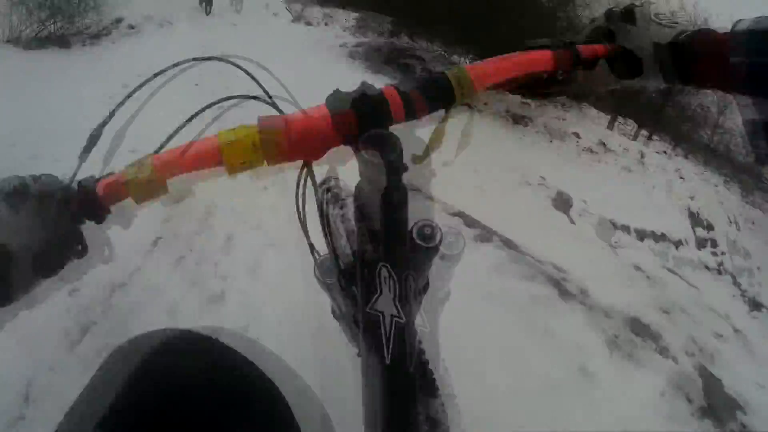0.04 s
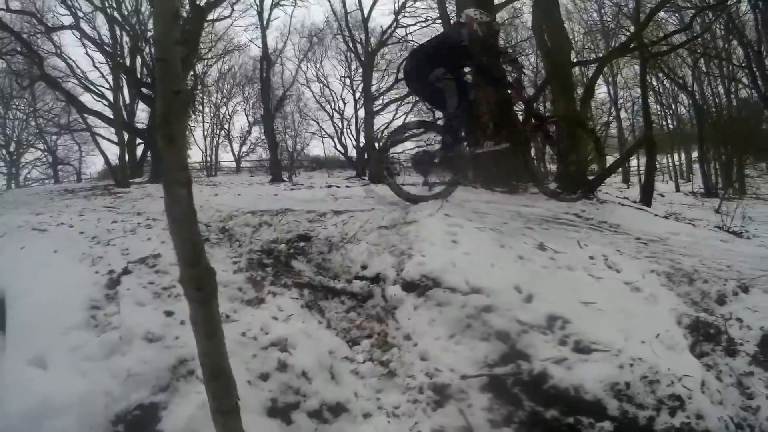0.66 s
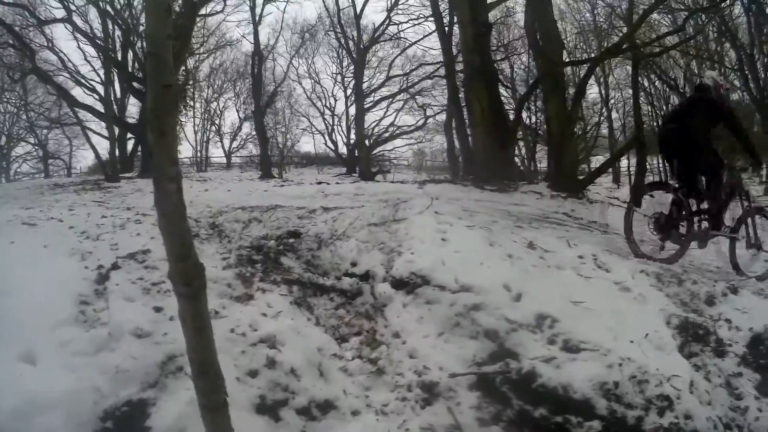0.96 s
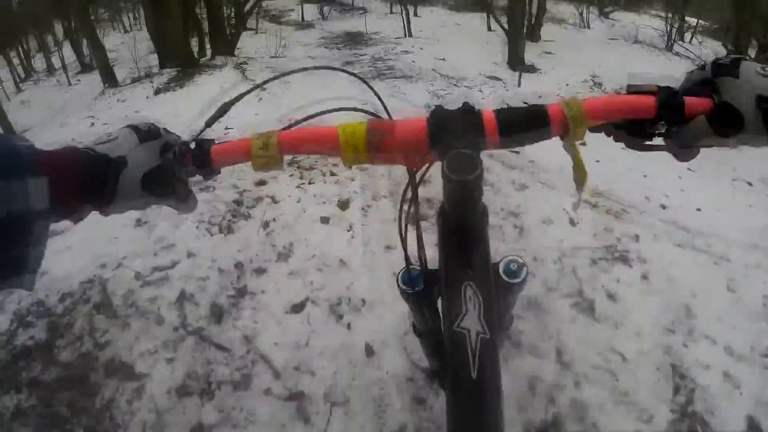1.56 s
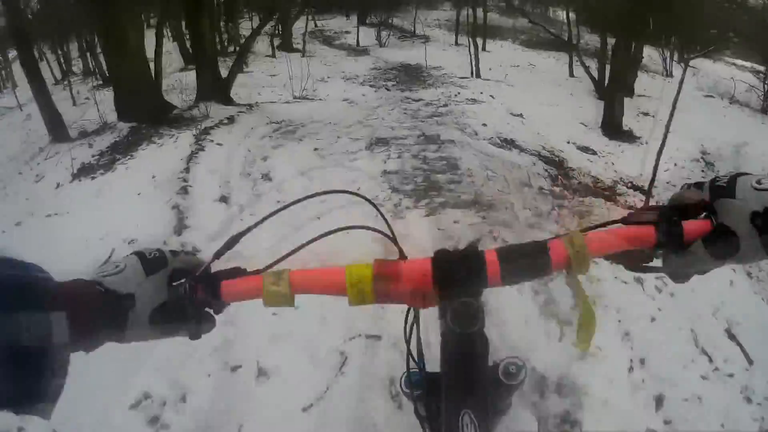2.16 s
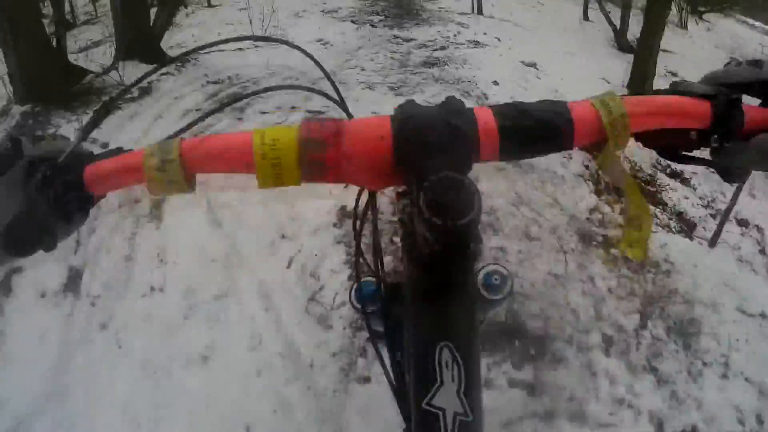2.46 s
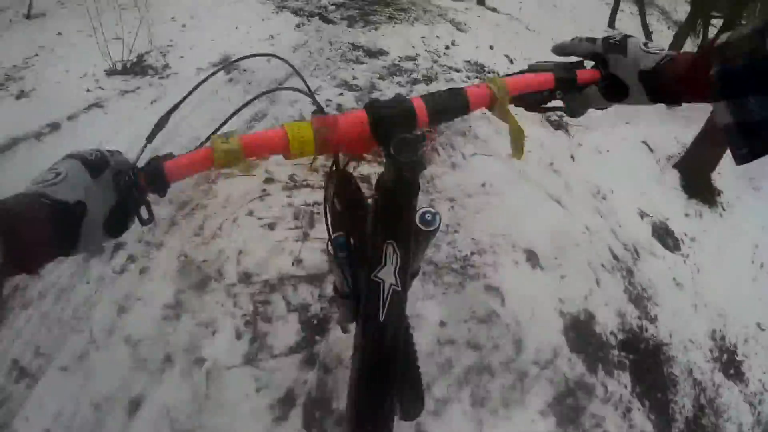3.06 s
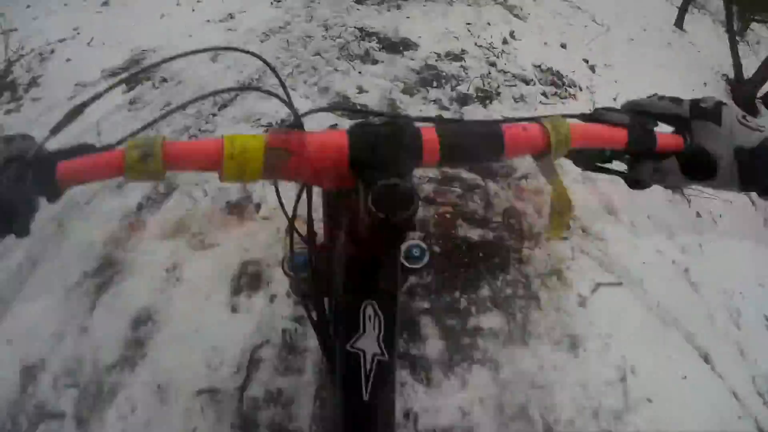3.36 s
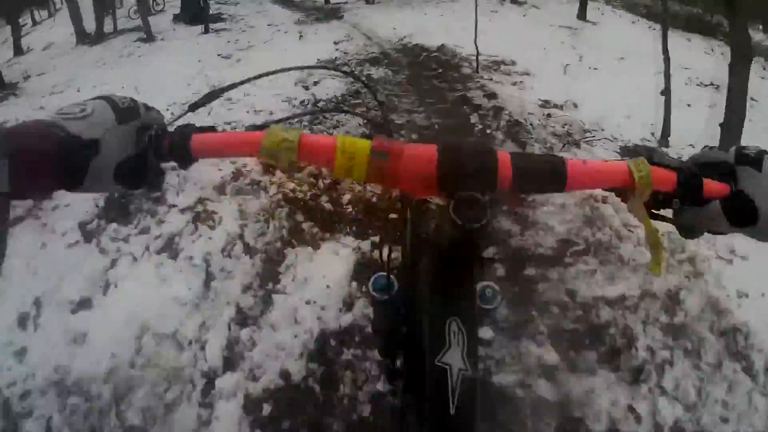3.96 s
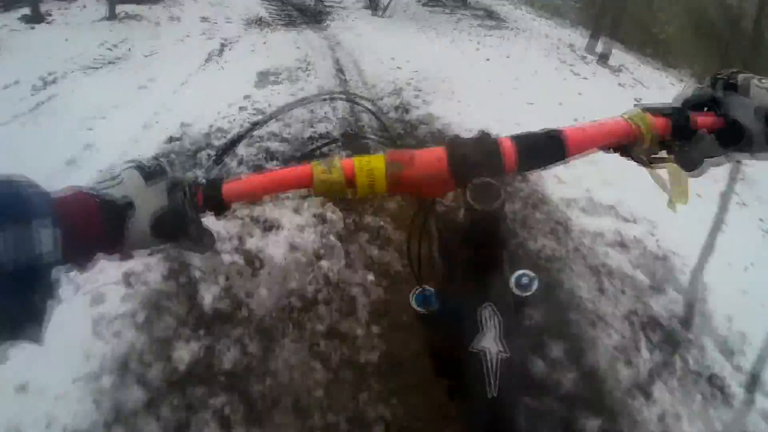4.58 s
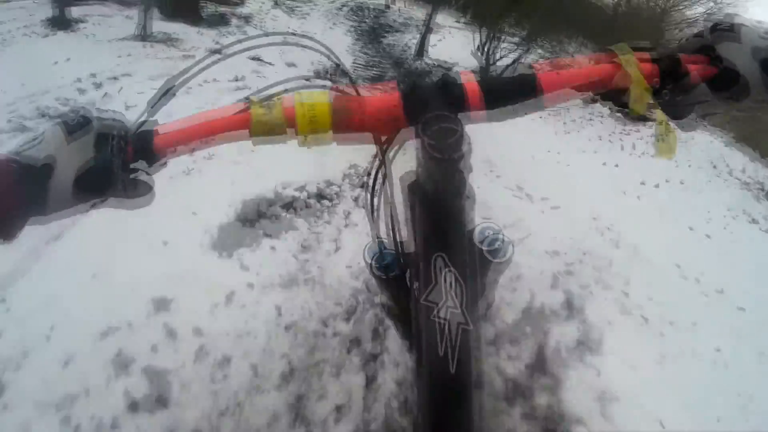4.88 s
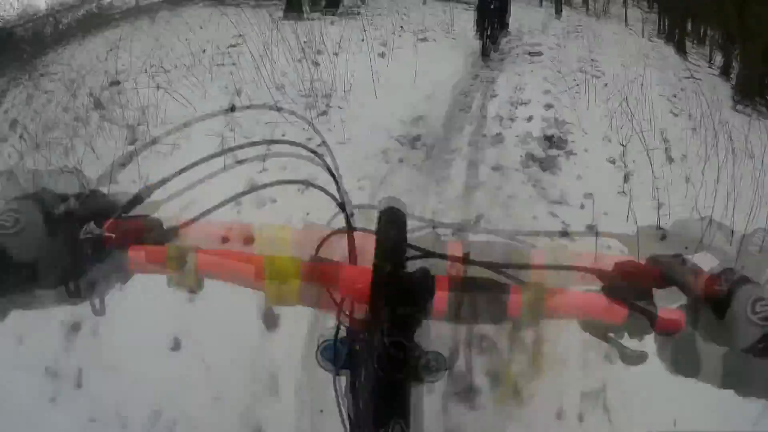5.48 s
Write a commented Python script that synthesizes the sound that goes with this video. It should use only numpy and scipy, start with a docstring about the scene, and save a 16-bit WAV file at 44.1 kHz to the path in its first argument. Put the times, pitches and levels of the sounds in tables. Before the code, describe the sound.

Wind and rough ground boom inside the plastic case of a body-worn camera as a mountain bike rides a snowy woodland trail. The wind soon falls quiet, then the ride returns with a faint, short skid. From about halfway, bumps bring hollow thumps and sharp, sometimes overloading knocks from the bike and camera mount. The buffeting grows louder, with dull tyre crunch and a thin high whirr far beneath it.

```python
"""Airflow and rough ground boom in the plastic case of a body-worn camera, with deep swings of wind
below, as a mountain bike rides a snowy woodland trail. Bumps thump the case; parts of the bike and mount
knock on it hard enough to overload the microphone. The tyres crunch dully through its walls and throw up
spray. For a moment the tyre sound drops out and the wind falls quiet, then the ride cuts back in.
Further back sit a short skid, a faint brake note, a thin high whirr and the still woods."""
import sys
import numpy as np
from scipy import signal
from scipy.fft import rfft, irfft
from scipy.io import wavfile
from scipy.ndimage import uniform_filter1d

SR = 44100
rng = np.random.default_rng(int(sys.argv[2]) if len(sys.argv) > 2 else 0)


def int16_out(signal):
    """Quantize to a 16-bit WAV file."""
    q = np.round(np.clip(np.atleast_2d(signal).T, -1, 1) * 32767)
    wavfile.write(sys.argv[1], SR, q.astype(np.int16))


N = 252693
TIME = np.arange(N) / SR

# Tone of the buffeting inside the case: (frequency [Hz], level [dB])
BOOM_SPECTRUM = [(30, -23), (70, -25.5), (100, -8.5), (130, -6), (220, -6.5), (290, -4.5), (348, 1.5),
                 (400, -7.5), (480, -15.5), (600, -25), (800, -39.5), (1300, -62), (3000, -73.5),
                 (9000, -99.5)]
# Low end of the wind: (frequency [Hz], level [dB])
WIND_SPECTRUM = [(15, -20.5), (30, -4), (55, -5.5), (85, -2.5), (115, -2.5), (180, -12.5), (400, -46.5),
                 (1500, -91.5)]
# Gusts pressing on the case: (start [s], length [s], level [dB])
GUSTS = [(0.02, 0.16, -25.5), (0.31, 0.05, -27.5), (1.02, 0.05, -44), (2.97, 0.22, -26.5),
         (5.07, 0.069, -24), (5.55, 0.15, -23)]
def buffeting(boom_db=-1, split_hz=470, wind_db=-24.5, wind_slope=0.55):
    """Eddies and ground shake boom in the case, over deep swings of wind that follow the shaking."""
    boom = turbulence(BOOM_SPECTRUM, steadiness=0.23, eddy_s=0.023)
    lows = signal.sosfiltfilt(signal.butter(4, split_hz, fs=SR, output="sos"), boom)
    strength = shake()
    boom = lows * strength + (boom - lows) * shake(hard=True)
    wind = turbulence(WIND_SPECTRUM, steadiness=0.3, eddy_s=0.18)
    gusts = swells(GUSTS, attack_s=0.0089, release_s=0.011)
    return boom * undb(boom_db) + wind * np.hypot(undb(wind_db) * strength ** wind_slope, gusts)


# Airflow over the case, rising with speed: (time [s], level [dB])
AIRFLOW = [(0, -28), (0.355, -33.5), (0.385, -40), (0.55, -39.5), (0.74, -51.5), (0.98, -54), (1.47, -48),
           (1.57, -38), (2.15, -39), (2.55, -31.5), (3.1, -27), (3.28, -36.5), (3.33, -21.5), (3.6, -16),
           (3.95, -21.5), (4.6, -21), (5.38, -26.5), (5.73, -18)]
# Rough ground: (start [s], length [s], level [dB], hardness as gain above the case's resonance [dB])
JOLTS = [(0, 0.026, -15, -27), (0.082, 0.099, -21, -22), (1.015, 0.26, -38, -4), (2.202, 0.096, -35.5, 0),
         (2.598, 0.056, -19, -6), (2.665, 0.07, -12.5, -3.5), (2.758, 0.086, -14.5, 3.5),
         (2.997, 0.024, -11.5, -15), (3.162, 0.024, -14.5, -6), (3.522, 0.05, -16.5, 1),
         (3.626, 0.082, -5.5, 1), (3.715, 0.145, -9, 1), (4.11, 0.327, -13, -1), (4.717, 0.032, -15.5, -19),
         (4.875, 0.061, -19, -3), (4.968, 0.192, -14, -1), (5.456, 0.11, -19, -9), (5.504, 0.18, -12.5, 1)]
JOLT_ATTACK_S, JOLT_RELEASE_S = 0.012, 0.0069
def shake(hard=False, airflow_hardness_db=-2):
    """Envelope of airflow and jolts shaking the case; with hard, the one above its resonance."""
    airflow = undb(curve(AIRFLOW) + hard * airflow_hardness_db)
    jolts = [(start, length, db + hard * hardness_db) for start, length, db, hardness_db in JOLTS]
    return np.hypot(airflow, swells(jolts, JOLT_ATTACK_S, JOLT_RELEASE_S))


def case_hum(hz=358, width_hz=75, gain_db=-6):
    """Airflow and jolts keep the hollow of the case humming."""
    hum = narrow_noise(hz, width_hz)
    power = uniform_filter1d(hum ** 2, SR // 30)
    return unit(hum / power ** 0.25) * shake() * undb(gain_db)  # compressed 2:1, then shaken


# Bumps in the trail: (time [s], level [dB], pitch [Hz], attack [s])
THUMPS = [(0.008, -8.5, 373.7, 0.0071), (1.766, -25, 337, 0.0062), (2.019, -22.5, 341, 0.0041),
          (2.814, -8, 152, 0.0046), (2.816, -5.5, 360.2, 0.0079), (2.902, 0.5, 397, 0.0031),
          (2.983, -12.5, 370, 0.0095), (3.011, -16, 355, 0.0024), (3.074, 4, 396, 0.0022),
          (3.154, -11.5, 405, 0.0057), (3.169, -2.5, 332, 0.0039), (3.307, -8.5, 387, 0.0038),
          (3.597, -8, 416, 0.0039), (4.102, -11.5, 438, 0.0046), (4.397, -1.5, 397, 0.0036),
          (4.516, -3, 362, 0.0051), (5.018, -5, 378, 0.0053), (5.186, -10.5, 365, 0.0059),
          (5.549, 2, 374, 0.0046)]
def thumps(mount_hz=140, mount_db=-11):
    """A soft push swells and dies in the hollow of the case, over the slower sway of its mount."""
    out, t = np.zeros(N), TIME[:SR // 8]
    mount = undb(mount_db) * np.sin(2 * np.pi * mount_hz * t)
    for at_s, db, hz, attack_s in THUMPS:
        envelope = t / attack_s * np.exp(1 - t / attack_s)
        add(out, at_s, undb(db) * envelope * (np.sin(2 * np.pi * hz * t) + mount))
    return out


# The case's ring under every knock: (frequency [Hz], width [Hz], level [dB])
CASE_MODES = [(646, 87, 7), (780, 350, 1.5), (1115, 98, 5.5), (1372, 112, 5.5), (1600, 40, -4),
              (1938, 118, 0), (2326, 98, -5.5), (2900, 330, -9), (3750, 74, -2.5), (4850, 680, -6.5),
              (5250, 1200, -12), (6000, 1100, -17), (7040, 2300, -17), (10600, 330, -18),
              (11180, 530, -16.5), (14600, 180, -2)]
# Hits of bike and mount: (time [s], level [dB], ring of the struck part [Hz], high cut [Hz])
KNOCKS = [(2.218, -40.5, 1210, 2800), (2.6125, -24, 1150, 1700), (2.68, -15.5, 1130, 2490),
          (2.794, -9.5, 1220, 4830), (2.8143, -1, 4370, 6500), (2.815, -0.5, 5900, 15100),
          (2.9055, -8.5, 1520, 6740), (2.9074, -13, 1770, 5400), (3.0057, -10, 5600, 8000),
          (3.0062, -13.5, 3750, 4800), (3.0087, -13, 1700, 3500), (3.0748, -3, 1670, 6000),
          (3.0756, -2, 5250, 9600), (3.207, -32.5, 1140, 1500), (3.3572, -16.5, 1470, 2850),
          (3.368, -12.5, 2040, 3150), (3.394, -33.5, 10200, 11900), (3.758, -14, 3170, 15900),
          (3.785, -24, 2900, 3800), (4.292, -34, 3100, 4000), (4.371, -16.5, 2050, 3030),
          (4.3934, -13.5, 1520, 4430), (4.6979, -11.5, 1280, 2060), (4.7444, -17.5, 2900, 3050),
          (4.929, -16, 1960, 3600), (4.9296, -15.5, 2950, 3900), (5.119, -19.5, 1230, 1460),
          (5.131, -31, 6200, 13100), (5.4938, -17, 1250, 1600), (5.656, -32.5, 7000, 12000),
          (5.668, -26.5, 1550, 9000), (5.675, -22.5, 1920, 5500)]
def knocks(grit_s=0.001, grit_db=-9, chatter_s=0.0055, chatter_db=-31, part_q=8, part_db=5, gain_db=2):
    """A click with a trail of grit rings the case and the struck part; softer contact loses the top."""
    out, t = np.zeros(N), TIME[:SR // 16]
    trail = undb(grit_db) * np.exp(-t / grit_s) + undb(chatter_db) * np.exp(-t / chatter_s)
    for at_s, db, part_hz, top_hz in KNOCKS:
        force = (t == 0) + trail * rng.standard_normal(len(t))
        hit = ring(force, CASE_MODES) + ring(force, [(part_hz, part_hz / part_q, part_db)])
        hit = highpass(lowpass(hit, top_hz), hz=550)
        add(out, at_s, undb(db + gain_db) * hit / np.abs(hit).max())
    return out


# Wall resonances that let the tyres through: (frequency [Hz], width [Hz], level [dB])
WALL_MODES = [(1093, 180, 5), (1353, 111, 7.5), (1836, 320, 0.5), (2950, 460, -2.5), (3750, 670, -2),
              (4274, 500, -1)]
# Tone of the spray: (frequency [Hz], level [dB])
SPRAY_SPECTRUM = [(1000, -15.5), (3500, 1.5), (4900, -5), (5750, 1), (6500, -5.5), (8600, -5),
                  (10300, -8.5), (12800, -17), (14800, -10.5), (15800, -33)]
# Tyres rolling through snow, one fader curve per run: (time [s], level [dB])
ROLL_RUNS = [
    [(0.0, -62), (0.114, -59.5), (0.38, -66.5)],
    [(1.63, -62), (1.74, -64), (2.07, -67.5), (2.46, -62), (2.79, -53), (2.89, -53.5), (3.09, -63),
     (3.36, -58.5), (3.51, -52), (3.78, -51.5), (4.16, -57), (4.87, -52.5), (5.04, -55.5), (5.31, -53.5),
     (5.48, -52), (5.73, -49.5)],
]
# Patches of wet snow: (start [s], length [s], level [dB])
SLUSH = [(1.03, 0.18, -65.5), (1.635, 0.031, -66), (2.22, 0.037, -63), (3.34, 0.08, -53.5),
         (3.8, 0.77, -65), (4.42, 0.24, -57.5), (4.7, 0.31, -54.5)]
def tyres(muffle_hz=4700, tread_db=5.5, spray_db=-7, slush_tread_db=-5):
    """The tread crunches dully through the case walls; the spray hisses above it, more in wet snow."""
    roll = sum(undb(curve(run, left=-np.inf, right=-np.inf)) for run in ROLL_RUNS)
    slush = swells(SLUSH, attack_s=0.02, release_s=0.032)
    crunch = snow(grains_per_s=440, crunch_db=-7, flicker_db=2)
    tread = unit(lowpass(ring(crunch, WALL_MODES), muffle_hz)) * undb(tread_db)
    spray = colour(snow(grains_per_s=540, crunch_db=-8.5, flicker_db=4), SPRAY_SPECTRUM)
    tread *= np.hypot(roll, undb(slush_tread_db) * slush)
    spray *= np.hypot(undb(spray_db) * roll, slush)
    return tread + spray


def snow(grains_per_s, crunch_db, flicker_db, spread_db=4.5):
    """Flickering hiss of packed snow with the clicks of single crystals."""
    grains = (rng.random(N) < grains_per_s / SR) * rng.standard_normal(N)
    grains *= undb(spread_db * np.minimum(rng.exponential(size=N), 3))
    hiss = rng.standard_normal(N) * undb(flicker_db * wander(rate_hz=35))
    return hiss + undb(crunch_db) * unit(grains)


def skid(start_s=1.484, peak_s=1.562, end_s=1.612, start_db=-62, peak_db=-45):
    """A short dull swish of sliding snow swells and stops."""
    spectrum = [(300, -16), (800, -7.5), (1300, 1), (1550, -9), (1950, -11), (2600, -26),
                (6000, -32), (12000, -51)]  # (frequency [Hz], level [dB])
    swish = colour(rng.standard_normal(N), spectrum)
    gate = uniform_filter1d(1. * ((TIME > start_s) & (TIME < end_s)), SR // 100)
    return swish * undb(curve([(start_s, start_db), (peak_s, peak_db)])) * gate


def brake(at_s=1.728, fade_s=0.11, hz=708, db=-53):
    """A brake disc sings faintly for a moment."""
    return narrow_noise(hz, width_hz=30) * undb(db) * np.exp(-((TIME - at_s) / fade_s) ** 2)


# Swells of the whirr, perhaps the freewheel coasting: (start [s], length [s], level [dB])
WHIRR_SWELLS = [(0, 0.22, -68), (2.62, 0.58, -70), (5.08, 0.24, -67.5), (5.45, 0.28, -73)]
def whirr(hz=8680, width_hz=220, bed_db=-63.5, airflow_slope=0.37):
    """A thin band of high noise grows with the airflow and swells in spells."""
    bed = undb(bed_db + airflow_slope * curve(AIRFLOW))
    spells = swells(WHIRR_SWELLS, attack_s=0.05, release_s=0.05)
    return narrow_noise(hz, width_hz) * np.hypot(bed, spells)


# Tone of the background bed: (frequency [Hz], level [dB])
AMBIENCE_SPECTRUM = [(30, 7), (500, 2), (1000, -5.5), (2000, -11), (4200, -13), (5000, -14.5),
                     (9000, -15.5), (13000, -19), (15000, -31.5), (16000, -44)]
def ambience(db=-57.5):
    """Still air in the woods and microphone hiss."""
    return undb(db) * colour(rng.standard_normal(N), AMBIENCE_SPECTRUM)


def turbulence(spectrum, steadiness, eddy_s):
    """Coloured noise whose strength is partly evened out over the life of an eddy."""
    noise = colour(rng.standard_normal(N), spectrum)
    power = uniform_filter1d(noise ** 2, int(eddy_s * SR))
    return unit(noise / power ** (steadiness / 2))


def narrow_noise(hz, width_hz):
    """Noise rung twice through one resonance: a wavering note at rms 1."""
    mode = [(hz, width_hz, 0)]
    return unit(ring(ring(rng.standard_normal(N), mode), mode))


def swells(rows, attack_s, release_s):
    """Envelope of (start, length, level) events that rise, hold and die away; their powers add."""
    power = 0
    for start, length, db in rows:
        rise = np.minimum(TIME - start, 0) / attack_s
        fall = np.maximum(TIME - start - length, 0) / release_s
        power += (undb(db) * np.exp(rise - fall)) ** 2
    return np.sqrt(power)


def wander(rate_hz):
    """Glide between random values, at rms 1."""
    hold = int(SR / rate_hz)
    steps = np.repeat(rng.standard_normal(N // hold + 1), hold)
    return unit(uniform_filter1d(steps, hold)[:N])


def curve(rows, **outside):
    """Join (time, level) rows by straight lines."""
    return np.interp(TIME, *np.transpose(rows), **outside)


def colour(x, spectrum):
    """EQ a sound with (frequency, level) points, to rms 1."""
    hz, db = np.transpose(spectrum)
    bins = np.maximum(np.fft.rfftfreq(N, 1 / SR), 1)
    gain = undb(np.interp(np.log(bins), np.log(hz), db))
    return unit(irfft(rfft(x) * gain, N))


def ring(x, modes):
    """Drive (frequency, width, level) resonances; neighbours swing in opposite directions."""
    return sum((-1) ** k * undb(db) * signal.lfilter(*signal.iirpeak(hz, hz / width, fs=SR), x)
               for k, (hz, width, db) in enumerate(modes))


def lowpass(x, hz):
    """Fourth-order high cut."""
    return signal.sosfilt(signal.butter(4, hz, fs=SR, output="sos"), x)


def highpass(x, hz):
    """Second-order low cut."""
    return signal.sosfilt(signal.butter(2, hz, "high", fs=SR, output="sos"), x)


def add(track, at_s, sound):
    """Mix a sound into the track."""
    i = int(at_s * SR)
    track[i:i + len(sound)] += sound[:N - i]


def undb(db):
    """Decibels to gain."""
    return 10 ** (np.asarray(db) / 20)


def unit(x):
    """Scale to rms 1."""
    return x / np.sqrt(np.mean(x ** 2))


def scene():
    """Everything reaches one microphone inside the case."""
    ride = buffeting() + tyres() + skid() + brake() + whirr() + thumps() + knocks()
    return (ride + ambience() + case_hum())[None]


def record(dry):
    """The loudest peaks clip flat, then a steep high cut takes off the top."""
    top_hz = 16200
    high_cut = signal.ellip(8, .02, 70, top_hz, fs=SR, output="sos")
    return signal.sosfilt(high_cut, np.clip(dry, -1, 1))


dry = scene()
out = record(dry)
int16_out(out)
```